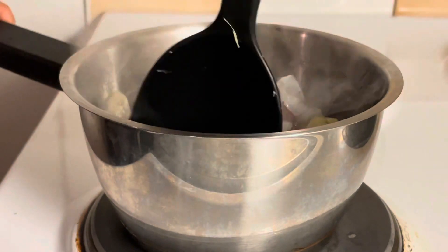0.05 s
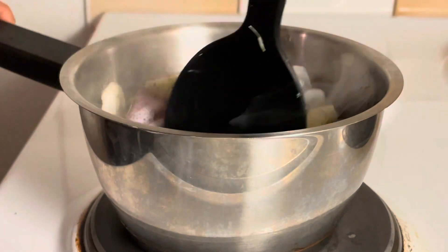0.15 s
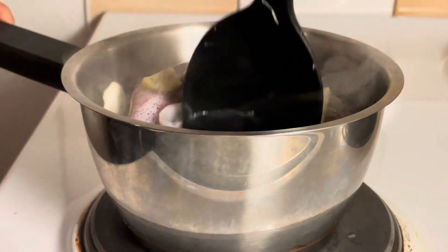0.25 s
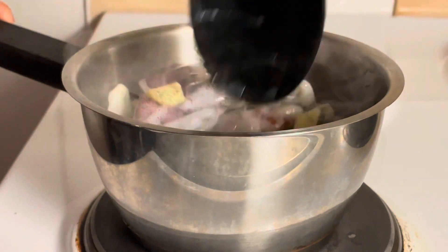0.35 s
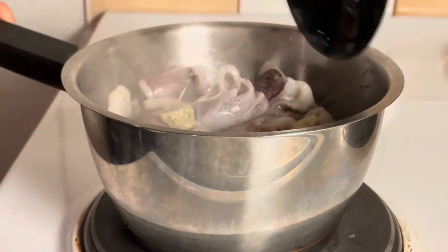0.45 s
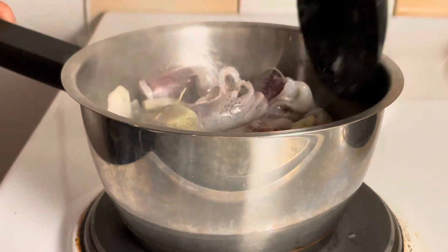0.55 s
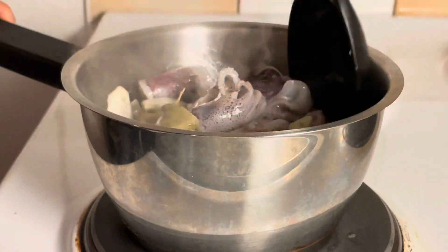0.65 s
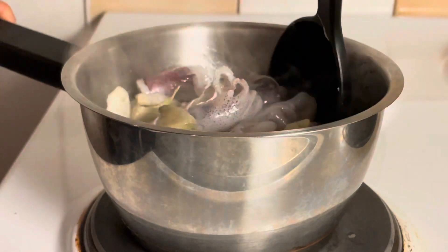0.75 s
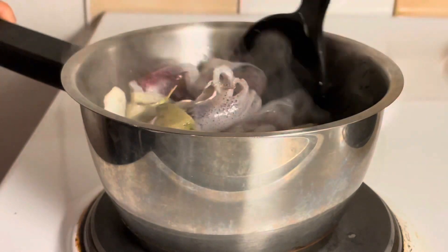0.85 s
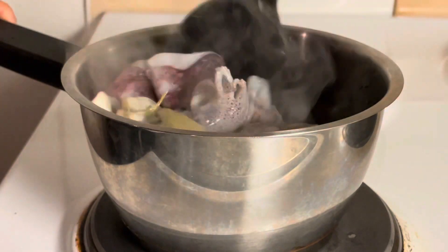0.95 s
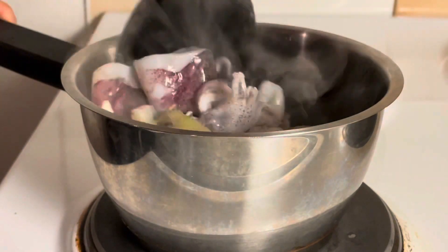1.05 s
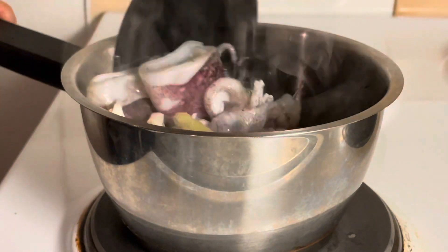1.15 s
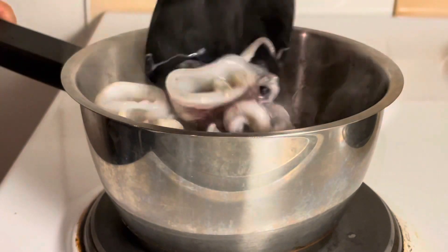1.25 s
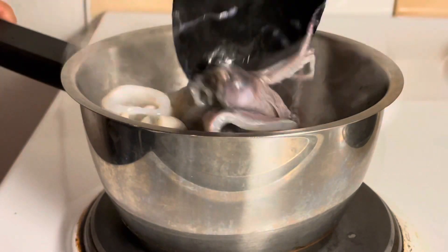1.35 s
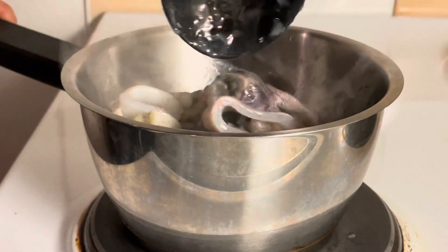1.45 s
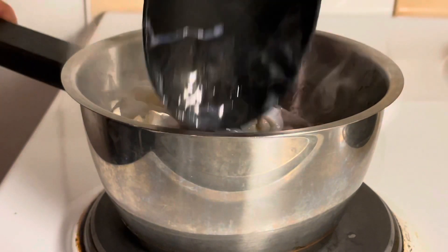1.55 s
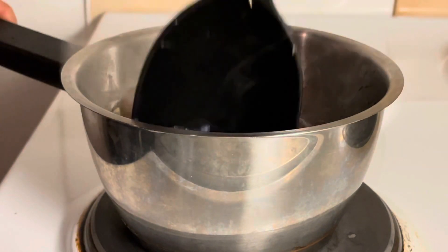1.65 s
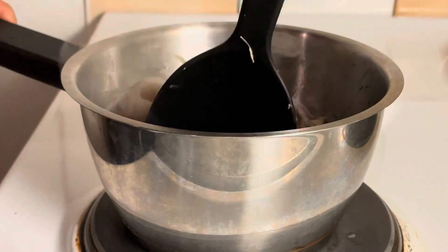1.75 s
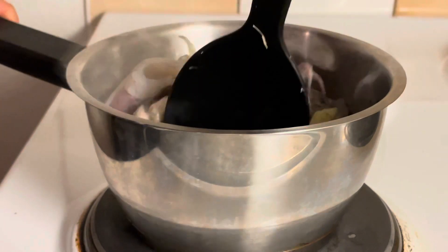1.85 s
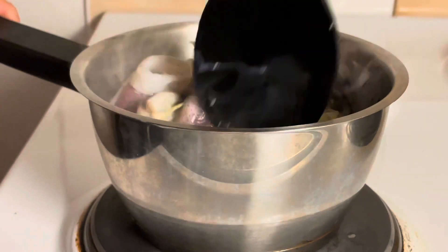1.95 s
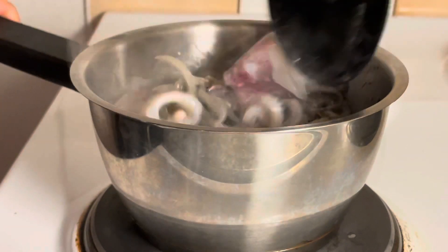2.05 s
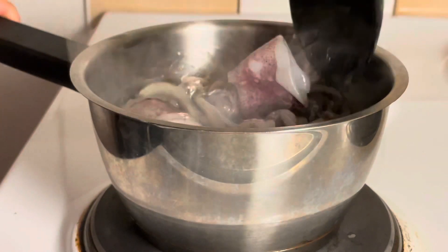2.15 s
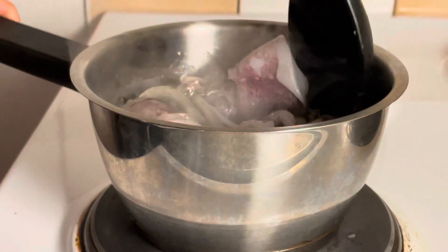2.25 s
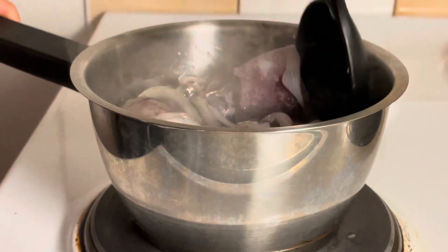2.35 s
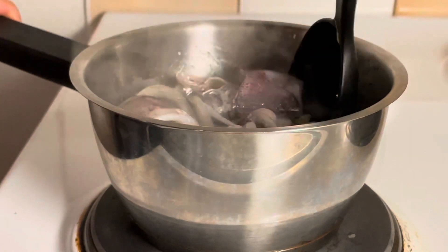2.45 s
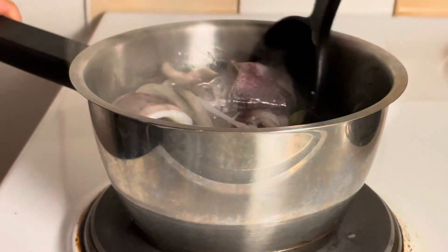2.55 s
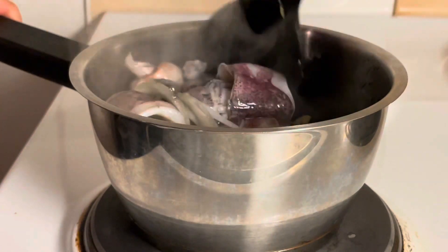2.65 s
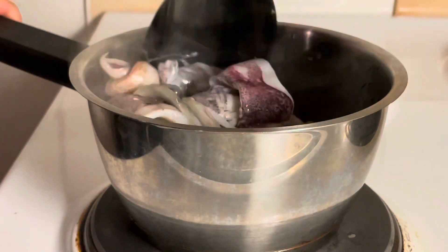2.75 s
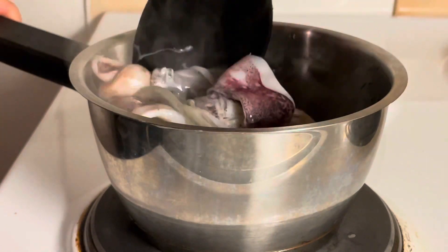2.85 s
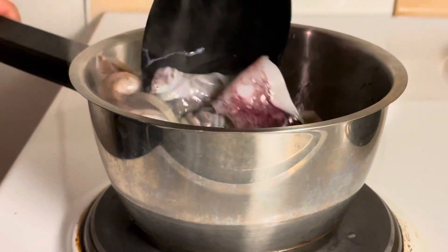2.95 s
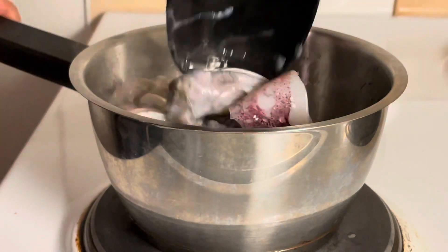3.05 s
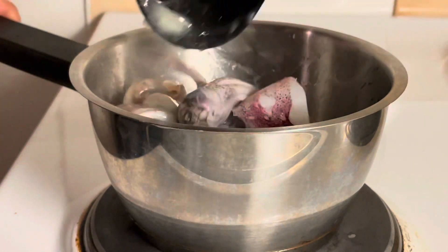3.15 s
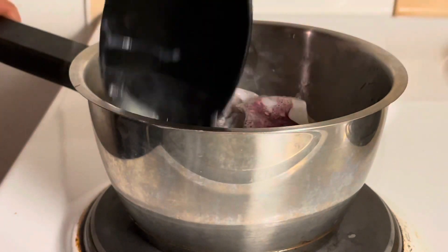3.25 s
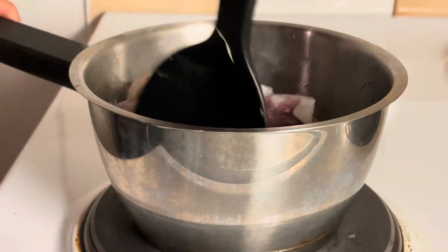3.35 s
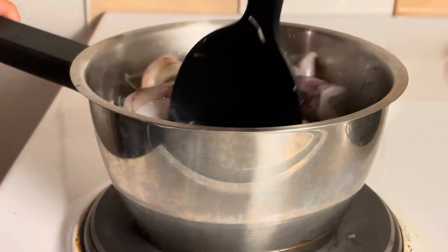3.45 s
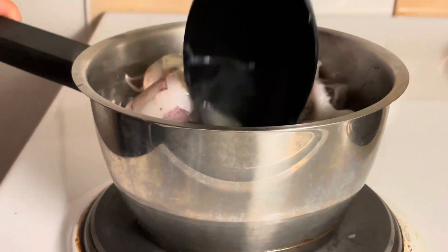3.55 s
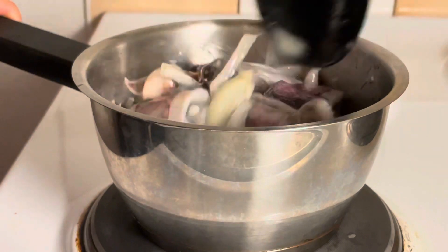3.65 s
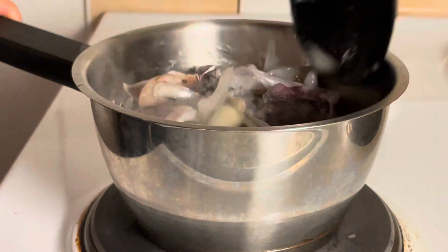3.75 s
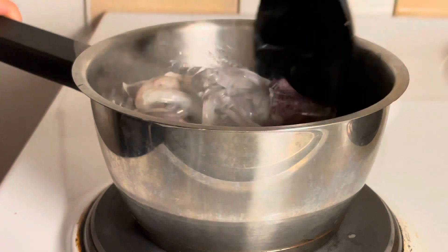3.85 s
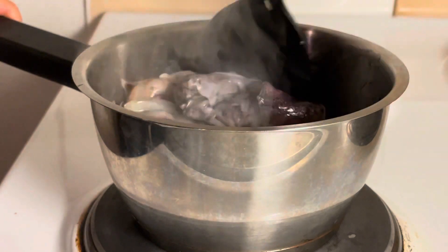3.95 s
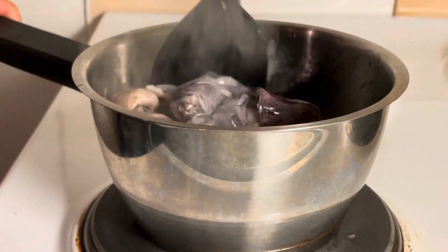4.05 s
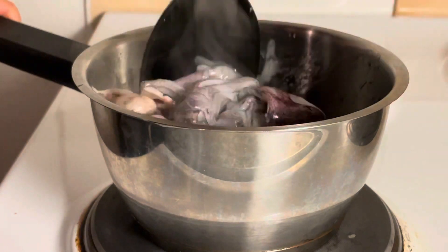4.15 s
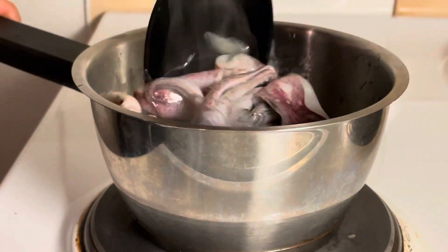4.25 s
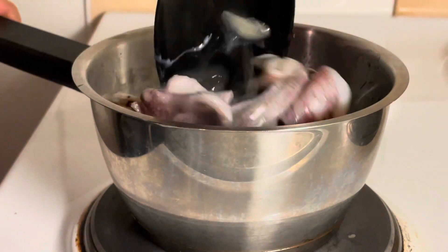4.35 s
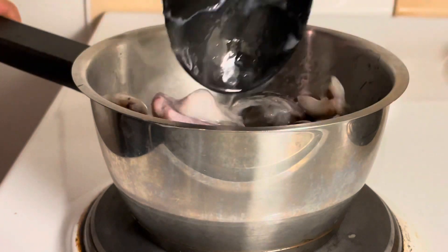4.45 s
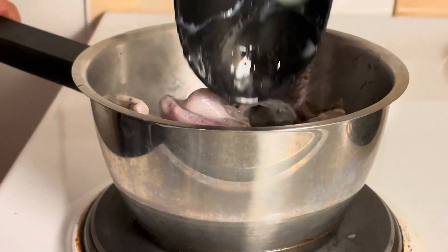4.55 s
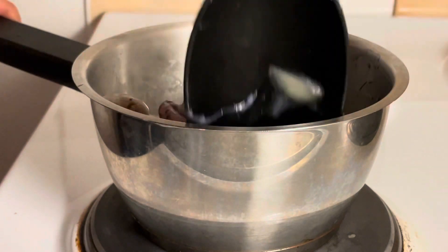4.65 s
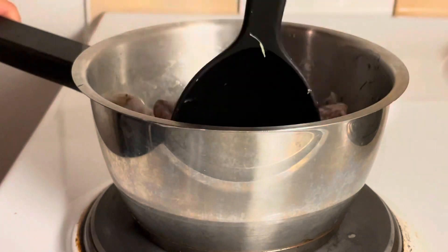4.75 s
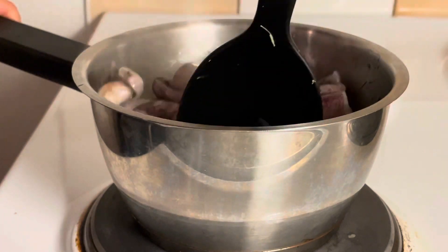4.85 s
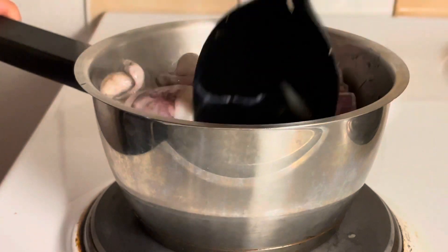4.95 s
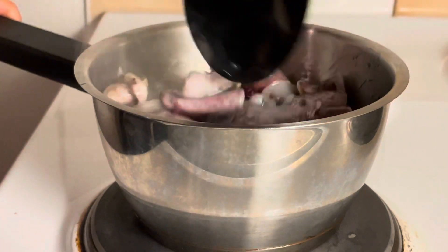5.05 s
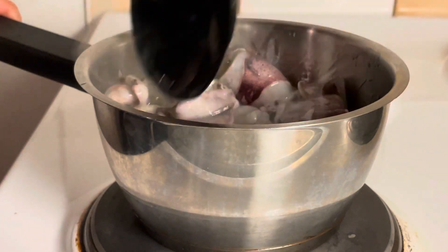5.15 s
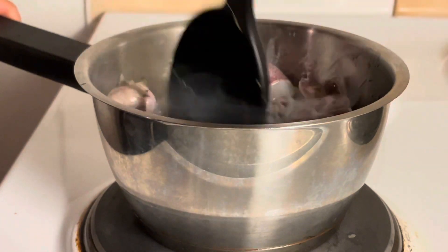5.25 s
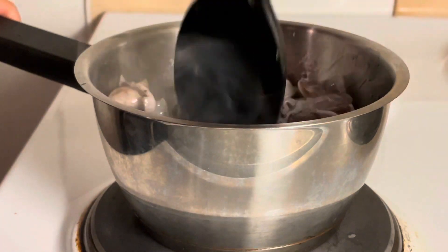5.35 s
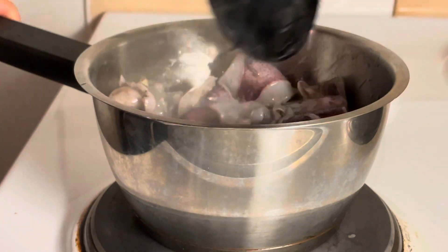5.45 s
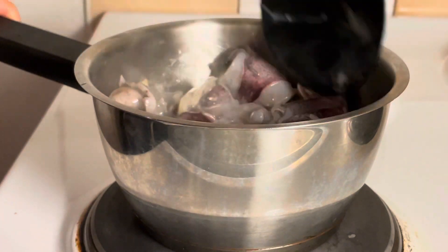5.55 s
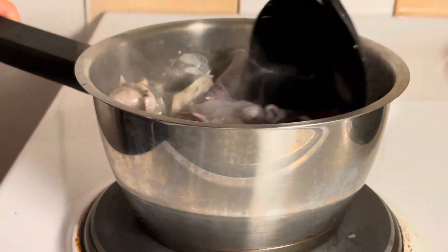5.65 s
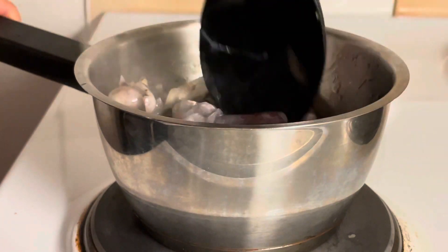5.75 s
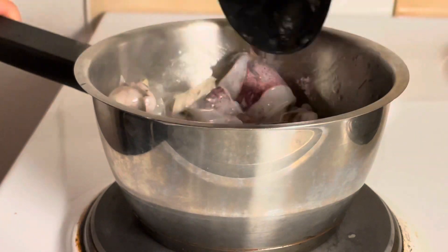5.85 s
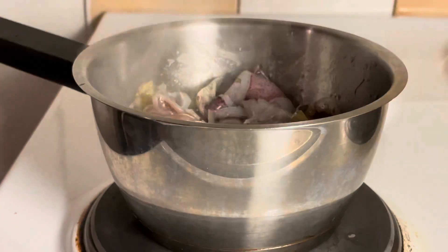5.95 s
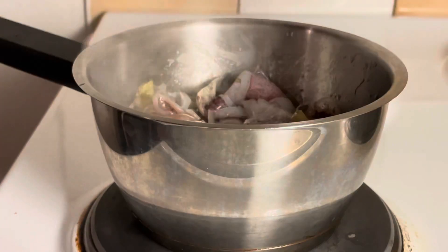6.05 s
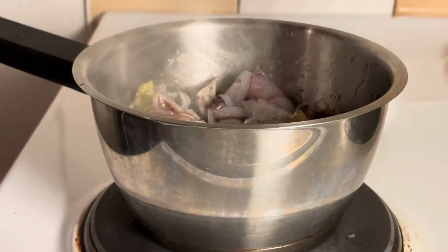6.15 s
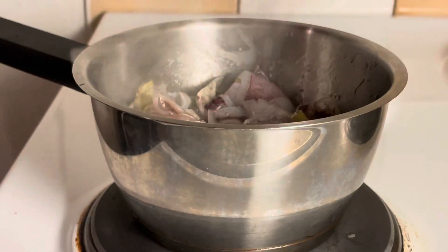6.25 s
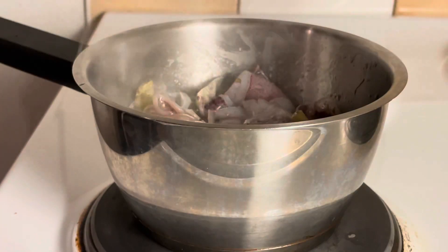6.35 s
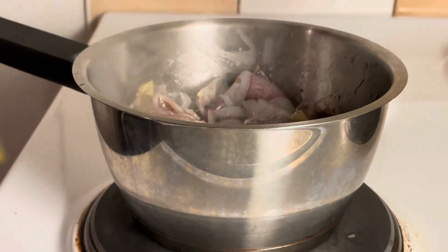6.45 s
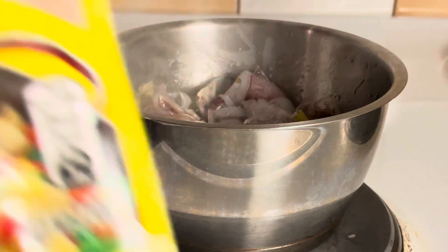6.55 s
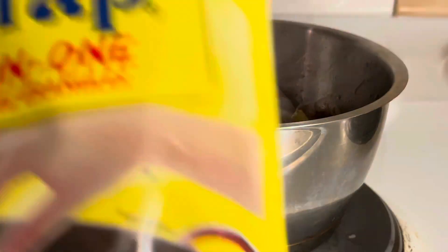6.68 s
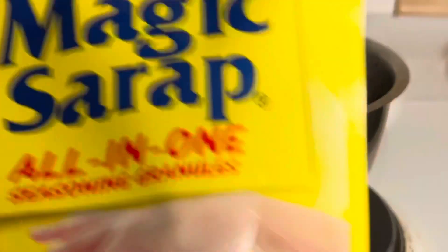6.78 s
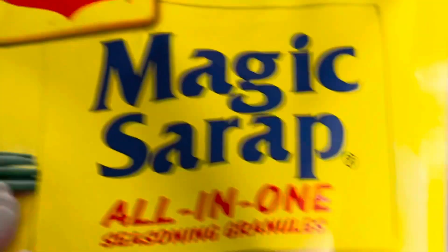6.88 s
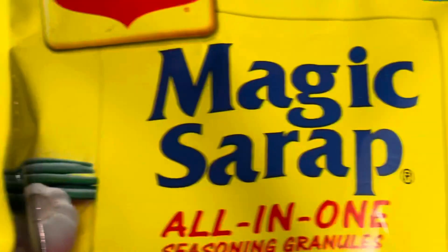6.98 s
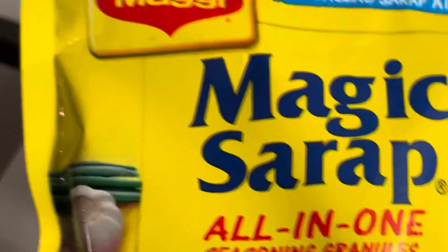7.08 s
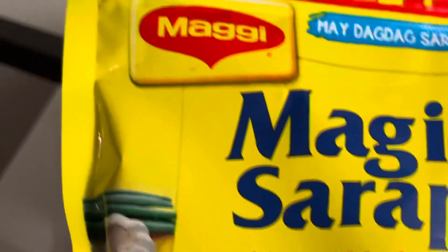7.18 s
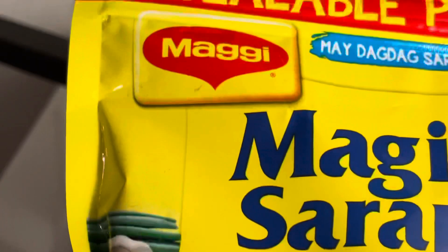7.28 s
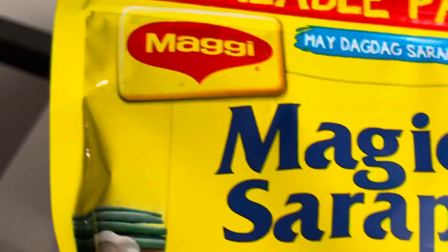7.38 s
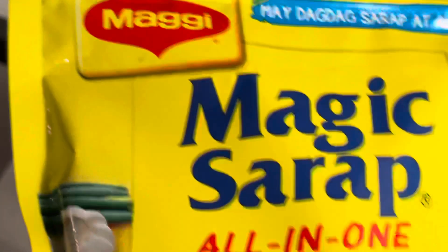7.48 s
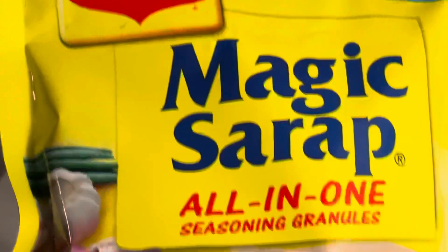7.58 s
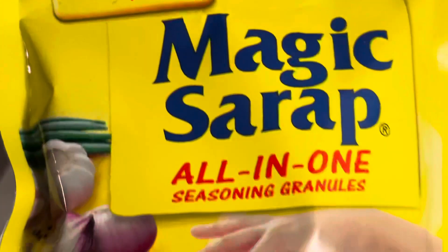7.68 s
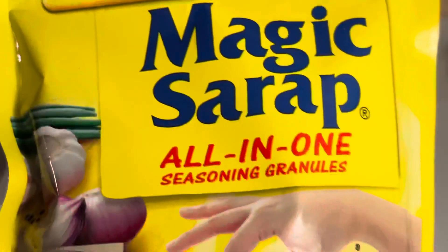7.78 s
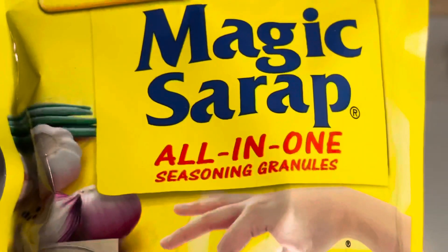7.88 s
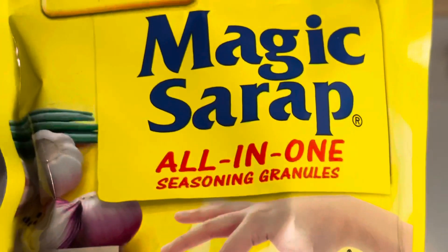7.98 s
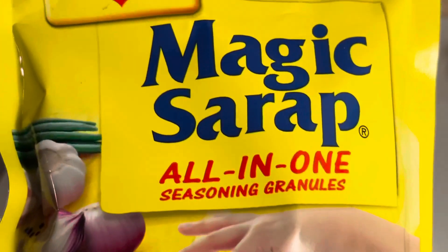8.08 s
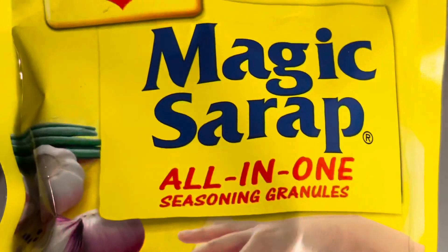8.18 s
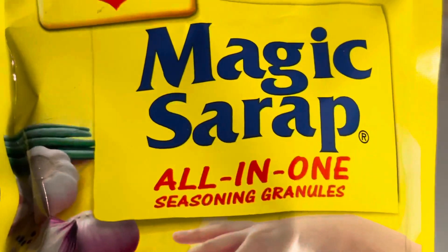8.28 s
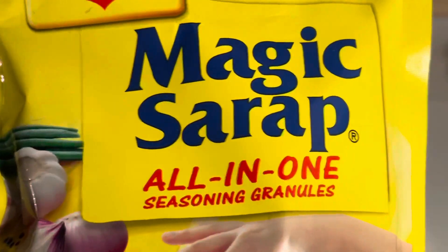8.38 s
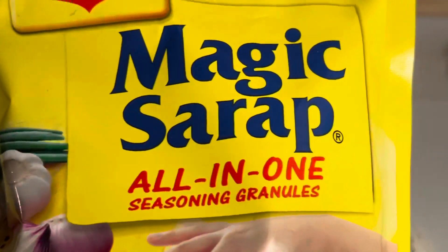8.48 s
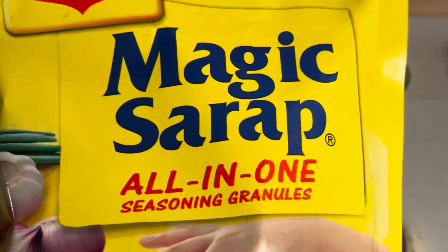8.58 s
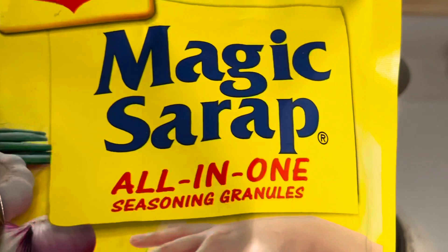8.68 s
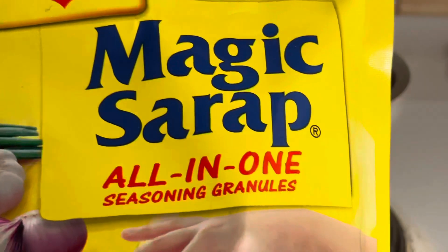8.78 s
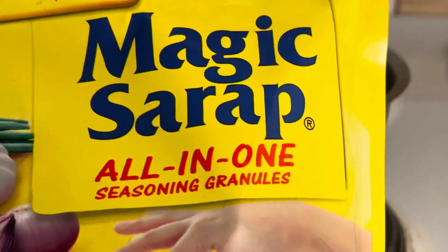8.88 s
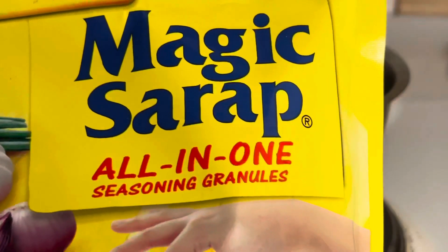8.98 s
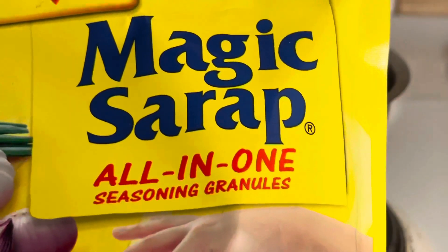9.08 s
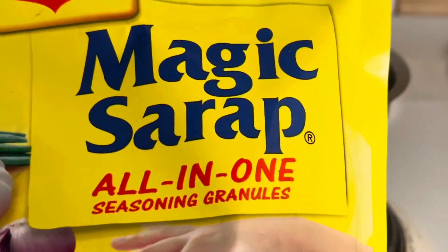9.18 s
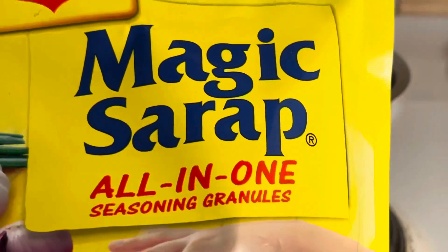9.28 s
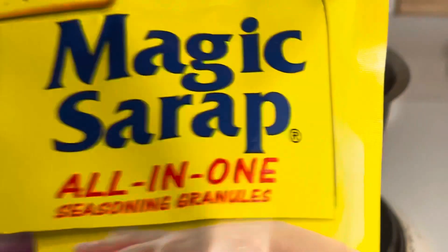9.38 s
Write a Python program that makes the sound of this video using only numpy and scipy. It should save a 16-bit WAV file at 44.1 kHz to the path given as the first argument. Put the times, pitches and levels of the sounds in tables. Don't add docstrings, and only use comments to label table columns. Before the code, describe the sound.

In a small home kitchen, wet seafood fries in a steel saucepan, close to a stereo phone microphone. Juicy gurgling and fizzing surge into steam flares as a plastic spatula turns the food, clacking on steel and rocking the pan. Fat pops and spits. The hardest blow comes near the middle, followed by another flare. Near six seconds the sound fades quickly and a calmer, softer sizzle continues with sparse pops.

```python
import sys
import numpy as np
from scipy import signal
from scipy.fft import rfft, irfft, next_fast_len
from scipy.io import wavfile
from scipy.ndimage import uniform_filter1d

SR = 44100
rng = np.random.default_rng(int(sys.argv[2]) if len(sys.argv) > 2 else 0)


def master(y):
    cut = np.clip(np.atleast_2d(y).T, -1, 1)
    pcm = np.round(cut * 32767)
    wavfile.write(sys.argv[1], SR, pcm.astype(np.int16))


def field_ratio(decibels):
    return 10 ** (np.asarray(decibels, dtype=float) / 20)


N = 415422
WIDE = next_fast_len(N + 4096)
BINS = np.fft.rfftfreq(WIDE, 1 / SR)


def evened(x):
    return x / np.sqrt(np.mean(x ** 2) + 1e-20)


def read(points, hz, column=1):
    table = np.array(points)
    return np.interp(np.log(hz + 1), np.log(table[:, 0] + 1), table[:, column])


def coloured(x, gain):
    return irfft(rfft(x, WIDE) * gain, WIDE)[..., :N]


def add(mix, s, sound):
    part = mix[round(s * SR):][:len(sound)]
    part += sound[:len(part)]


def seconds(length):
    return np.arange(int(length * SR)) / SR


def fuzzy_whistle(phase, smooth):
    fuzz = evened(uniform_filter1d(rng.standard_normal((2, 5000)), size=smooth, axis=1))[:, :len(phase)]
    return fuzz[0] * np.cos(phase) + fuzz[1] * np.sin(phase)


def kitchen():
    # frequency in Hz, level in dB.
    colour = [(35, -19), (60, -9), (75, -4.5), (117, 2), (151, -5.5), (204, -10), (238, -1), (271, -14),
              (315, -8.5), (344, -2), (371, -9.5), (446, -3), (610, -4.5), (742, -7), (800, -24),
              (1040, -29), (1760, -120)]
    # time in seconds, level in dB.
    rumble = [(0.0, -52), (0.37, -57.5), (0.71, -52.5), (1.23, -59), (1.78, -54), (1.97, -62.5),
              (2.41, -57.5), (3.04, -62), (3.38, -54.5), (3.88, -56), (4.01, -58), (4.51, -59.5),
              (4.8, -53), (5.14, -57), (6.38, -54), (7.29, -55.5), (8.4, -53.5), (9.42, -55)]
    t = np.arange(N) / SR
    waver = evened(uniform_filter1d(rng.standard_normal(N), size=6000))
    hum = field_ratio(-53.5 + 0.47 * waver) * np.sin(2 * np.pi * 50 * t)
    rumble_db = np.interp(t, *np.transpose(rumble))
    noise = evened(coloured(rng.standard_normal(N), field_ratio(read(colour, BINS))))
    return field_ratio(rumble_db + 6.0) * noise + hum


def add_thumps(mix):
    # start in seconds, peak in dB, pitch in Hz.
    thumps = [
        (0.331, -40, 61.9),
        (0.697, -39, 162),
        (0.748, -36, 64),
        (1.57, -46, 193),
        (1.691, -36.5, 127),
        (2.14, -42, 117),
        (3.36, -37, 62),
        (4.594, -33, 200),
        (4.719, -38, 61.5),
        (5.6, -41, 117),
    ]
    t = seconds(.25)
    for s, db, hz in thumps:
        push = np.sin(2 * np.pi * hz * t * (1 - 0.62 * t))
        add(mix, s, field_ratio(db - 3.0 - 60 * t / 0.37) * push * np.minimum(t / 0.0017, 1))


def add_crackles(mix):
    # start in seconds, peak in dB.
    crackles = [
        (0.3481, -18),
        (0.7272, -22),
        (1.724, -17),
        (3.3453, -32),
        (4.5947, -17),
        (5.908, -39),
        (6.6213, -31),
        (9.0354, -28),
    ]
    t = np.arange(399) / SR
    for s, db in crackles:
        noise = np.diff(uniform_filter1d(rng.standard_normal(400), size=2))
        add(mix, s, field_ratio(db - 4.5) * noise * np.exp(-t / 0.0031))


def snap(db, hz):
    t = np.arange(500) / SR
    ring = np.sin(2 * np.pi * hz * t) * np.exp(-t / 0.00071) * np.minimum(t / 0.0001, 1)
    puff = uniform_filter1d(rng.standard_normal(500), size=4) * np.exp(-t / 0.01)
    return field_ratio(db - 1.5) * (ring + 0.42 * np.roll(ring, 90) + 0.34 * puff)


def add_snaps(mix):
    # start in seconds, peak in dB, pitch in Hz.
    skins = [(0.119, -36, 4700), (1.7544, -33, 3130), (1.764, -14, 4540), (3.456, -16, 3960),
             (3.7, -28, 3520), (5.7793, -44, 3680), (7.1542, -32, 3430), (7.447, -28, 3040),
             (8.644, -34, 3010), (8.7042, -23, 3860), (8.885, -22, 6400), (8.981, -23, 3770),
             (9.1183, -29, 3660)]
    # start in seconds, level in dB before that
    # cut, pitch in Hz.
    softer_snaps = [(0.046, -26, 3100), (0.0853, -25, 3100), (0.184, -22, 3530), (0.2035, -19, 3580),
                    (0.2513, -18, 3730), (0.4923, -22, 2830), (0.5132, -24, 3670), (0.5791, -25, 3370),
                    (0.611, -17, 2430), (0.837, -25, 2990), (1.1565, -18, 3310), (1.3279, -26, 4100),
                    (1.4137, -27, 4110), (1.48, -23, 3000), (1.5666, -16, 2270), (1.698, -20, 4600),
                    (1.7534, -22, 3170), (1.848, -17, 6130), (2.0413, -27, 3280), (2.1814, -17, 5090),
                    (2.3037, -15, 5300), (2.382, -25, 2740), (2.4803, -25, 2950), (2.5491, -31, 2400),
                    (2.7177, -28, 2680), (3.1282, -23, 4150), (3.1627, -21, 2370), (3.2276, -21, 7150),
                    (3.3193, -18, 3100), (3.351, -18, 3100), (3.376, -27, 4440), (3.4915, -16, 3900),
                    (3.5696, -19, 4810), (3.683, -19, 2690), (3.7766, -16, 3170), (4.593, -5, 2280),
                    (4.6478, -16, 3140), (4.7331, -22, 2920), (4.9906, -26, 4250), (5.1266, -26.5, 3330),
                    (5.19, -18, 2990), (5.2684, -27, 2780), (5.306, -26, 3920), (5.41, -23, 3420),
                    (6.4777, -32, 3160), (6.9406, -31, 3370), (7.1551, -32, 3510), (7.4455, -32, 2260),
                    (8.1848, -33, 2220), (8.4833, -27, 3520), (8.5794, -30, 5950), (8.7046, -30, 3710),
                    (8.885, -29, 2780), (8.981, -29, 3690), (9.0922, -29, 4270)]
    for s, db, hz in skins:
        add(mix, s, snap(db, hz))
    for s, db, hz in softer_snaps:
        add(mix, s + .001, snap(db - 5, hz))


def add_spits(mix):
    # start in seconds, peak in dB, pitch in Hz.
    spits = [(0.184, -11, 3490), (0.204, -8, 3580), (0.2508, -17, 3650), (0.5124, -22, 3640),
             (0.61, -23, 4470), (0.728, -31, 2970), (0.8438, -22, 2970), (1.3299, -21, 4100),
             (1.4157, -25, 4150), (1.689, -15, 4400), (1.7529, -11, 3190), (2.195, -15.5, 3700),
             (2.234, -20, 3560), (2.482, -25, 2900), (4.357, -31, 6600), (7.67, -27, 3900),
             (7.89, -26.5, 2300), (2.719, -21, 3010), (3.1267, -14.5, 4230), (3.225, -21, 7200),
             (3.35, -20, 3020), (3.5697, -13, 4830), (3.8005, -20, 2600), (3.926, -18.5, 5050),
             (4.6466, -26, 3150), (5.1297, -27, 4420), (5.3053, -21.5, 3900), (5.417, -25, 3290),
             (6.4763, -22, 3150), (6.562, -23.5, 3190), (6.939, -25, 3400), (8.4852, -26, 3450),
             (8.5794, -24, 6000), (9.0906, -25, 4350)]
    t, length = seconds(.08), 0.006
    for s, db, hz in spits:
        whistle = t / length * np.exp(1 - t / length) * fuzzy_whistle(2 * np.pi * hz * t, 80)
        crack = np.diff(rng.standard_normal(len(t) + 1))
        crack = crack * np.minimum(t / 0.0081, 1) * np.exp(-t / length)
        add(mix, s - .002, field_ratio(db - 16.5) * (whistle + field_ratio(-17) * crack))


def scrape():
    length = .092
    u = seconds(length) / length
    slip_db = 3.3 * np.minimum(rng.exponential(1, len(u)), 4)
    slips = rng.standard_normal(len(u)) * field_ratio(slip_db)
    wall = signal.butter(4, (690, 3730), "bandpass", fs=SR, output="sos")
    ring = evened(signal.sosfilt(wall, slips))
    squeak_hz = 2640 + (3550 - 2640) / (1 + np.exp(-(u - .5) / 0.057))
    squeak = fuzzy_whistle(2 * np.pi * np.cumsum(squeak_hz) / SR, 110)
    soft_ends = np.minimum(20 * np.minimum(u, 1 - u), 1)
    return (field_ratio(-29.5 - 5.5 * u) * ring + field_ratio(-40) * squeak) * soft_ends


def steel_wall():
    # pitch in Hz, level in dB, time to die away by 60 dB in seconds.
    rings = [(900, -75, 0.2), (1250, -15.5, 0.14), (1950, -12, 0.39), (2280, -38, 0.11), (2630, -11, 5.0),
             (2860, -39, 0.074), (2900, -4, 0.015), (3300, -13, 0.065), (3580, -44, 0.18),
             (3900, -24, 0.17), (4867, -19, 0.044), (5240, -26, 0.029)]
    t = seconds(.25)
    return sum(field_ratio(db - 60 * t / min(t60, .11)) * np.sin(2 * np.pi * hz * t) for hz, db, t60 in rings)


def knock(db, low_hz, high_hz, high_db, steel):
    t = seconds(.25)
    blade = np.sin(2 * np.pi * low_hz * t) * field_ratio(-60 * t / 0.021) * np.minimum(t / 0.00094, 1)
    blade = blade + field_ratio(high_db) * np.sin(2 * np.pi * high_hz * t) * field_ratio(-110 * t / 0.021)
    echo = np.zeros(len(t))
    echo[[0, 130, 235, 480, 900]] = [0.94, 0.11, 0.18, -0.2, -0.099]
    rattle = evened(signal.oaconvolve(rng.standard_normal(len(t)), blade[:60])[:len(t)])
    rattle = field_ratio(-13.5) * rattle * field_ratio(-60 * t / 0.15)
    clack_db = -5.5 + 2 * min(high_db, 3) + 0.4 * (db - 4.5)
    clack = sum(np.sin(2 * np.pi * hz * t) for hz in (1840, 2120, 2756, 3400))
    clack = field_ratio(clack_db) * clack * field_ratio(-60 * t / 0.01)
    blow = signal.oaconvolve(blade + clack, echo)[:len(t)] + rattle
    blow = blow + field_ratio(2.0 + 1.9 * (db + 2.0)) * steel
    blow = blow - uniform_filter1d(uniform_filter1d(blow, size=50), size=50)
    return field_ratio(db - 2.0) * blow * np.minimum(t / 0.00083, 1) ** 1.7


def add_knocks(mix):
    # start in seconds, peak in dB, low ring in Hz, high ring in Hz, level of the high ring in dB.
    knocks = [(0.3042, -11, 1014, 1350, -3.5), (0.493, -13.5, 790, 1510, 7.5),
              (0.534, -18.5, 970, 2110, -13), (0.518, -25, 900, 1400, -9), (0.691, -17.5, 845, 1340, -1),
              (1.567, -11.5, 846, 2260, 1), (2.138, -14, 760, 1560, -1.5), (2.39, -28, 1250, 1710, 13.5),
              (3.319, -18, 830, 1370, 0), (3.696, -20, 730, 1550, 6), (4.594, -4, 900, 2280, 4.5),
              (4.614, -20, 900, 2450, 4), (4.674, -19, 1450, 2200, -3), (4.6895, -8, 1360, 3300, -25),
              (4.708, -11.5, 800, 1280, -3), (4.846, -15, 880, 2430, -10), (5.563, -22, 1030, 2580, -8),
              (5.673, -26, 616, 1200, -1), (5.793, -25, 555, 1150, -13), (5.841, -25, 1060, 2600, -6),
              (7.445, -27, 990, 2280, 1)]
    steel = steel_wall()
    for s, *blow in knocks:
        add(mix, s, knock(*blow, steel))


def pan_levels():
    # time in seconds, level in dB.
    simmering = [(0, 8.5), (.5, 4.5), (1.05, 2.5), (1.3, -0.5), (2.4, 3.5), (3.05, 1.5), (3.9, 4.5),
                 (4.5, -2.5), (5.2, 3.5), (5.65, 0.5), (5.95, -4), (6.6, -5), (7.2, -6), (9.42, -6.5)]
    # start in seconds, length in seconds, strength in dB, sag in dB per second, dryness in dB.
    flares = [
        (0.036, 0.296, 16.5, 5, -2.5),
        (0.895, 0.2, 7.5, -3, -5.5),
        (1.708, 0.67, 16.5, 10.5, 0.5),
        (2.33, 0.14, 3, 10, -1),
        (3.34, 0.52, 18.5, 19.5, 0),
        (3.884, 0.365, 8, 17.5, -1),
        (4.728, 0.53, 18.5, 25.5, 0),
        (6.297, 0.15, 5, 25, 1),
    ]
    # start in seconds, length in seconds, strength in dB, dryness in dB.
    puffs = [(0.375, 0.14, 10, -2.5), (2.382, 0.023, 9, -4), (2.473, 0.023, 1, -11), (5.842, 0.02, 5, -3),
             (4.387, 0.013, -6, 3.5), (5.123, 0.016, 5, -7), (0.58, 0.05, 11, -2.5), (0.72, 0.021, 8, 0),
             (0.835, 0.018, 10.5, -3), (1.33, 0.024, -12, -20), (1.433, 0.024, -4, -10),
             (1.568, 0.16, 6, -3), (2.722, 0.033, 5, -1.5), (1.462, 0.032, 4, -2),
             (2.909, 0.067, -3.5, -10), (3.12, 0.019, 16, -2.5), (3.219, 0.018, 8, 0.5),
             (4.631, 0.078, 9.5, -0.5), (5.298, 0.018, 9.5, -4.5), (5.411, 0.023, 8.5, -5),
             (5.609, 0.032, 2.5, 0), (5.776, 0.02, 5, -7), (7.462, 0.087, -12, 7.5),
             (8.176, 0.025, -2.5, -7), (8.483, 0.096, 2, -3), (8.703, 0.077, -11, 7),
             (9.03, 0.051, 2.5, -1)]
    # middle in seconds, length in seconds, depth in dB.
    lulls = [(0.717, 0.011, 3), (1.253, 0.12, 2), (0.777, 0.097, 1), (5.394, .035, 4), (5.815, .03, 4),
             (.02, 0.036, 1), (4.293, 0.12, 2), (4.468, 0.054, 2.5), (3.276, 0.051, 1), (1.523, 0.028, 1),
             (2.466, 0.032, 8), (2.68, 0.08, 6), (2.817, 0.12, 3.5), (3.098, 0.036, 8), (3.21, 0.022, 7),
             (4.713, 0.027, 3), (5.247, 0.037, 6), (5.714, 0.1, 11), (6.67, 0.098, 7.5), (6.903, 0.036, 4),
             (7.603, 0.045, 8), (8.158, .04, 4), (8.42, 0.039, 7), (8.556, 0.042, 4.5), (9.23, 0.18, 4.5),]
    # gurgle, sputter, fizz, steam.
    # Resting level in dB.
    rest_db = [-43.5, -48, -48.5, -59]
    simmer_share = [0.55, 0.86, 0.37, 0.6]
    burst_db = [-57, -51, -52.5, -56]
    strength_share = [0.65, 0.53, 1.154, 1.14]
    sag_share = [0.29, 0.1, 0.82, 2]
    dry_share = [0.47, -0.72, -0.96, 1.56]
    lull_share = [0.23, 0.96, 1.9, 0.97]
    rise_s = [0.02, 0.072, 0.046, 0.024]
    t = np.arange(0, N / SR + .002, .002)
    rest, simmer, burst, strength, sag, dry, lull, rise = np.array(
        [rest_db, simmer_share, burst_db, strength_share, sag_share, dry_share, lull_share, rise_s])[..., None]

    beats = sum(np.sin(2 * np.pi * (hz * t + rng.random())) for hz in np.geomspace(9, 30.6, num=40))
    beat_db = np.outer([.3, 1.45, 2.26, 2.3], evened(beats))
    simmer_db = simmer * np.interp(t, *np.transpose(simmering))
    power = field_ratio(2 * (rest + simmer_db + beat_db))

    swell = np.array([5.5, -9, -6, -5])[:, None]
    bursts = [(*row, rise, .035, swell) for row in flares]
    bursts += [(s, length, db, 54, dry_db, 0.01, 0.01, 0) for s, length, db, dry_db in puffs]
    for s, length, db, sag_db, dry_db, attack, release, swell_db in bursts:
        edges = np.minimum((t - s) / attack + .5, (s + length - t) / release + .5)
        gate = np.clip(edges, 0, 1) * field_ratio(swell_db * np.clip(1 - (t - s) / 0.14, 0, 1))
        sagged_db = sag * sag_db * np.clip(t - s, 0, length)
        power = power + gate ** 2 * field_ratio(2 * (burst + strength * db + dry * dry_db - sagged_db))
    smothered_db = sum(db * np.exp(-(2 * (t - s) / length) ** 4) for s, length, db in lulls)
    levels = 10 * np.log10(power) - lull * smothered_db
    return [np.interp(np.arange(N) / SR, t, row) for row in levels]


def bubbles(lo_hz, hi_hz, per_s, turns, spread_db, wash):
    out, count = np.zeros(N), 16
    size = field_ratio(spread_db * np.minimum(rng.exponential(1, N), 4)) * (rng.random(N) < per_s / SR)
    kind = rng.integers(0, count, N)
    for k, hz in enumerate(np.geomspace(lo_hz, hi_hz, count)):
        u = np.arange(1, int(4 * turns * SR / hz)) * hz / SR / turns
        grain = np.sin(2 * np.pi * turns * u * (1 + 0.019 * u))
        grain = np.minimum(8 * u, 1) * np.exp(-1.5 * u) * grain
        grain = grain * np.sqrt(hz) / np.linalg.norm(grain)
        out += signal.oaconvolve(size * (kind == k), grain)[:N]
    band = (BINS > lo_hz) & (BINS < hi_hz)
    share = np.clip(wash, 0, 1)
    single = evened(out) * np.sqrt(band.mean())
    return np.sqrt(1 - share) * single + np.sqrt(share) * rng.standard_normal(N)


def patchy(x, patch_db, flicker_db):
    # middle in seconds, length in seconds, pitch in Hz, width in Hz, depth in dB.
    shades = [(4.87, .2, 1750, 800, 8.5), (5.8, .1, 2400, 1500, 1), (0.17, 0.19, 1700, 600, 8),
              (.2, .3, 3500, 620, 0.5), (.45, 0.22, 3380, 530, -6), (0.32, 0.26, 1600, 400, -2),
              (1.7, 0.28, 1000, 610, -1.5), (2.2, 0.57, 3400, 400, -2.5), (1.9, 0.12, 5940, 1300, -6),
              (1.38, 0.27, 2360, 1000, -5), (3.43, 0.32, 1600, 600, 4), (3.39, .25, 1000, 500, -3.5),
              (3.45, .1, 3800, 900, -3), (3.54, 0.087, 4700, 1300, -6), (4, 0.11, 1500, 810, -4),
              (5, 0.2, 1200, 360, -0.5), (5.5, 0.17, 1900, 550, -1), (5.2, 0.092, 2900, 1160, -9),
              (7.7, 3.5, 3630, 315, -1), (9.6, 2.4, 750, 240, -2), (5.8, 7.5, 1200, 310, 1),
              (7.9, 4.1, 2550, 330, 1.5), (5.19, 0.11, 2900, 1000, 4), (5.47, 0.7, 1150, 360, -0.5),
              (0.32, 0.13, 4500, 1400, -2.5), (1.8, .2, 1700, 600, 3), (3.9, .2, 800, 300, -2),
              (4.4, .25, 800, 300, -1)]
    hz, t, z = signal.stft(x, SR, nperseg=256, noverlap=192)
    patches = rng.standard_normal(z.shape[::-1]).T
    patches = evened(uniform_filter1d(uniform_filter1d(patches, size=2, axis=0), size=36, axis=1))
    surges = np.minimum(rng.exponential(1, len(t)), 3) ** 2
    surges = evened(signal.lfilter([1], [1, -.9], surges - surges.mean()))
    shade_db = 0
    for s, length, mid_hz, width, db in shades:
        off_time, off_pitch = 2 * (t - s) / length, 2 * (hz[:, None] - mid_hz) / width
        shade_db = shade_db + db * np.exp(-off_time ** 4 - off_pitch ** 4)
    z = z * field_ratio(patch_db * patches + flicker_db * surges - shade_db)
    return signal.istft(z, SR, nperseg=256, noverlap=192)[1][:N]


def frying():
    # frequency in Hz, level in dB.
    gurgle_colour = [(250, -10.5), (420, -6), (600, -6.5), (800, -6.5), (1050, -2), (1500, -1.5),
                     (1900, -6), (2600, -9), (4000, -12), (7000, -18), (10000, -14.5), (16000, -38)]
    # frequency in Hz, level in dB.
    sputter_colour = [(1400, -45), (1900, -6), (2300, 2), (3100, -2), (3700, -1.5), (4600, -23.5)]
    # frequency in Hz, level in dB.
    fizz_colour = [(2200, -35), (3000, -4), (3700, -6), (4500, -1.5), (5500, -3.5), (7000, -7.5),
                   (9000, -4), (12000, -22.5)]
    # frequency in Hz, level in dB.
    steam_colour = [(4000, -37.5), (5500, -4), (7000, -5), (9000, 2), (11000, -5.5), (13000, -8.5),
                    (15500, -11.5), (17000, -61)]
    # frequency in Hz, width in Hz, level in dB.
    resonances = [(578, 76, -9.5), (734, 19, -7), (927, 106, -5.5), (1060, 79, -4), (1252, 32.5, -4),
                  (1423, 17, -25), (1785, 34, -10.5), (2200, 540, -10.5), (2748, 76, -8), (3000, 40, -9.5),
                  (3578, 150, -13.5), (4180, 44, -16), (4320, 98, -15.5), (4700, 46, -20),
                  (5090, 140, -16.5), (6320, 160, -13), (6950, 150, -6)]
    gurgle_db, sputter_db, fizz_db, steam_db = pan_levels()
    pan = .55
    for hz, width, db in resonances:
        width = max(width, 45)
        pan = pan + field_ratio(db + 5.5) / (1 + (2 * (BINS - hz) / width) ** 2)

    juice = bubbles(345.0, 6830, 3000, 3.24, 2.3, 0.53)
    whistles = bubbles(1800, 9000, 400, 40.0, 2.5, 0.12)
    ticks = bubbles(2000, 9900, 300, 1.2, 4.4, 0.021)
    fat = bubbles(1600, 9000, 4000, 9.0, 2.3, 0.53) + 0.59 * whistles + 0.3 * ticks
    vapour = bubbles(5000, 15200, 5000, 1.8, 5.5, 0.55)

    gurgle = evened(coloured(juice, field_ratio(read(gurgle_colour, BINS)) * pan))
    sputter = evened(coloured(fat, field_ratio(read(sputter_colour, BINS)) * pan))
    fizz = evened(coloured(fat, field_ratio(read(fizz_colour, BINS)) * pan))
    steam = evened(coloured(vapour, field_ratio(read(steam_colour, BINS))))
    layers = field_ratio(gurgle_db + 1.5) * gurgle + field_ratio(sputter_db - 1.63) * sputter
    layers = layers + field_ratio(fizz_db - 0.27) * fizz + field_ratio(steam_db + 10.0) * steam
    return patchy(layers, 1.7, 0.74)


def scene():
    near = kitchen() + frying()
    add_thumps(near)
    add_crackles(near)
    add_snaps(near)
    add_spits(near)
    add(near, 4.6, scrape())
    add_knocks(near)
    detour = evened(uniform_filter1d(rng.standard_normal(len(BINS)), size=300))
    delay = 0.0096 * (1 + np.tanh(detour))
    scattered = coloured(near, np.exp(-2j * np.pi * np.cumsum(delay) * BINS[1]))
    return np.array([near, scattered])


def two_ports(dry):
    # frequency in Hz, lead of the left in radians, likeness from 0 to 1, left over right in dB.
    port_table = [(60, 0, .99, 0), (200, .1, .88, -1), (430, .1, .93, 2), (780, .5, .68, 1),
                  (950, .3, .7, 4.5), (1300, -.1, .9, 1), (1900, 0, .97, .3), (2600, 0, .94, 0),
                  (3100, .3, .87, 0), (4000, .2, .87, 0), (5200, .45, .83, 0), (5700, -1.2, .72, 0),
                  (6700, -.8, .75, 0), (7400, -1.7, .7, 0), (8450, -3.0, .9, 0), (9350, -3.3, .88, 0),
                  (11000, -4.6, .65, 0), (12700, -6.2, .9, 0), (13200, -6.28, .95, 0)]
    same = np.clip(read(port_table, BINS, column=2), 0, 1)
    shares = np.sqrt([(1 + same) / 2, (1 - same) / 2])
    direct, scattered = rfft(dry, WIDE) * (BINS < 16450) * shares
    turn = np.exp(.5j * read(port_table, BINS)) * field_ratio(read(port_table, BINS, column=3) / 2)
    return irfft(np.array([(direct + scattered) * turn, (direct - scattered) / turn]), WIDE)[:, :N]


def thrifty(ports, side_db, mid_db, faint_db):
    both = [ports[0] + ports[1], ports[0] - ports[1]]
    z = signal.stft(both, SR, nperseg=1024, noverlap=512)[2]
    power = abs(z[:, :512].reshape(2, 64, 8, -1) ** 2).mean(2)
    power = uniform_filter1d(power, size=5, axis=2)
    lead_db = 10 * np.log10(power[0] / (power[1] + 1e-30) + 1e-30)
    keep = np.array([lead_db > -mid_db, lead_db < side_db])
    keep[:, :4] = True
    keep[0, 42:] = power[0, 42:] > power[0, 2:20].mean(0) * field_ratio(2 * faint_db)
    mask = np.pad(keep.repeat(8, 1), [(0, 0), (0, 1), (0, 0)])
    total, diff = signal.istft(z * mask, SR, nperseg=1024, noverlap=512)[1]
    return np.array([total + diff, total - diff])[:, :N] / 2


def scene_change():
    t = np.arange(N) / SR - 5.904
    depth = np.clip(np.minimum(1 + t / .034, 1 - t / .004), 0, 1)
    return field_ratio(-32 * depth ** 2.5)


def low_pass(x):
    return signal.sosfilt(signal.butter(12, 15950, fs=SR, output="sos"), x)


def record(dry):
    ports = thrifty(two_ports(dry), 10.0, 10.18, -18.5)
    return low_pass(ports * scene_change())


dry = scene()
out = record(dry)
master(out)
```